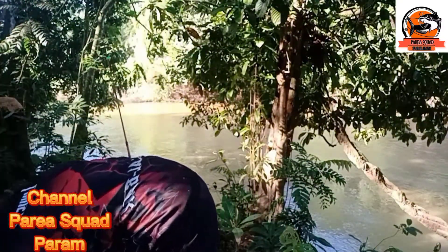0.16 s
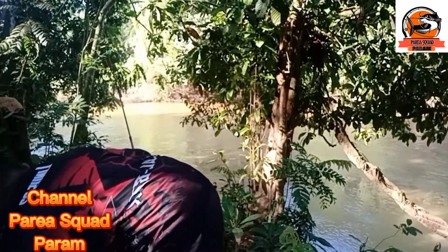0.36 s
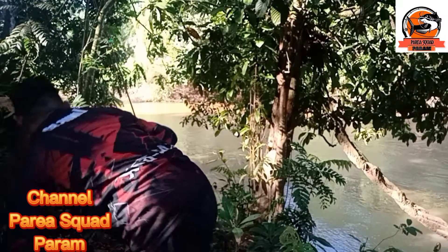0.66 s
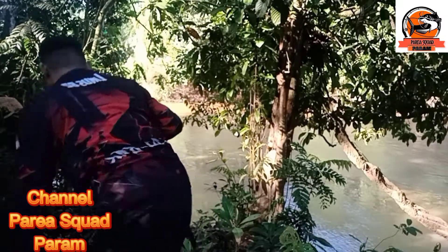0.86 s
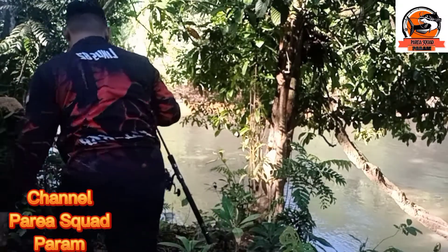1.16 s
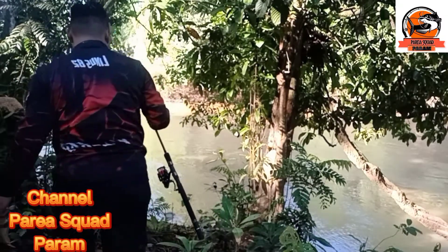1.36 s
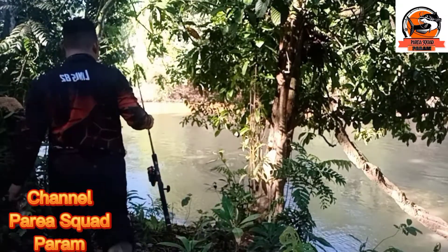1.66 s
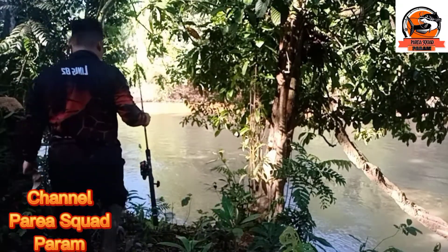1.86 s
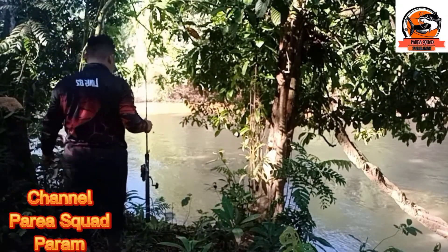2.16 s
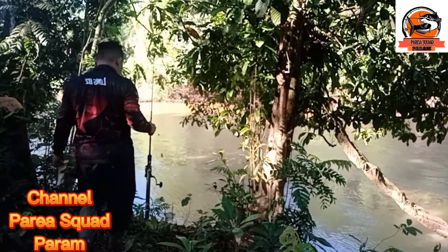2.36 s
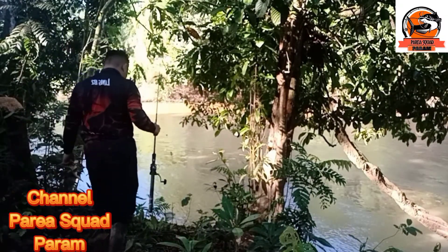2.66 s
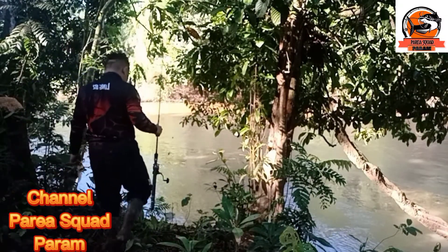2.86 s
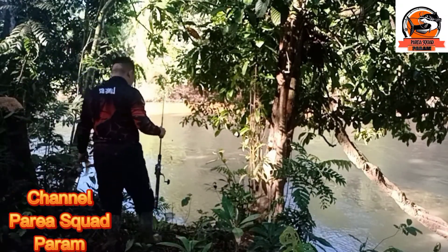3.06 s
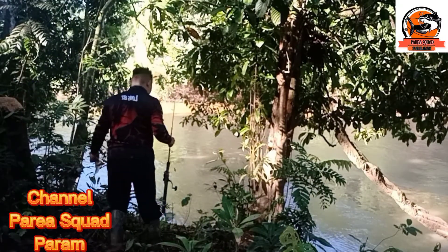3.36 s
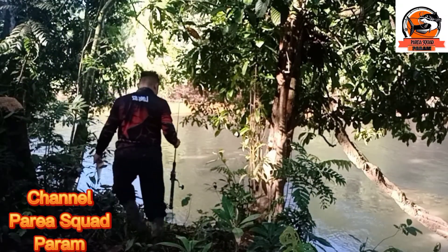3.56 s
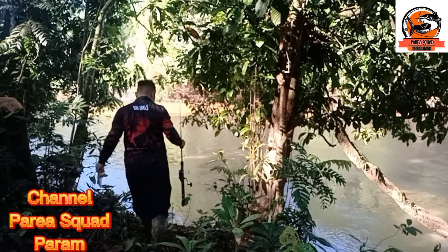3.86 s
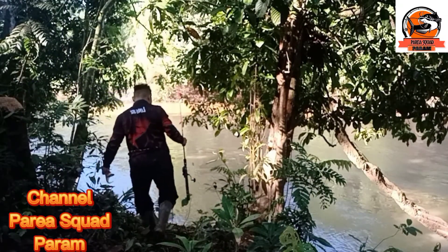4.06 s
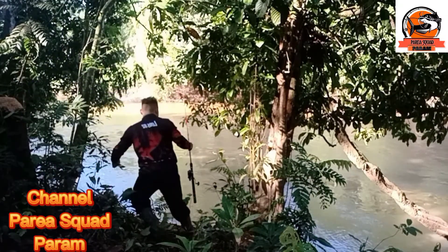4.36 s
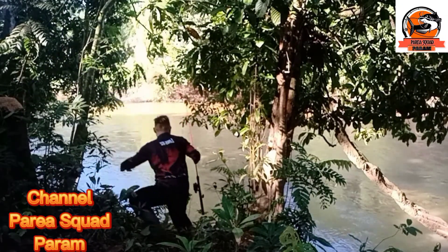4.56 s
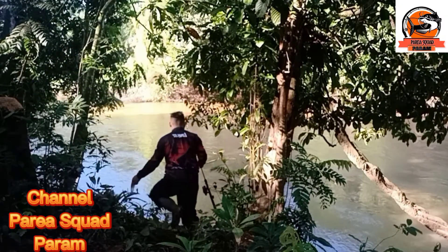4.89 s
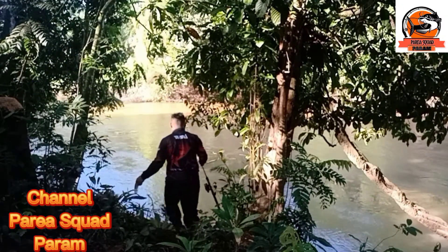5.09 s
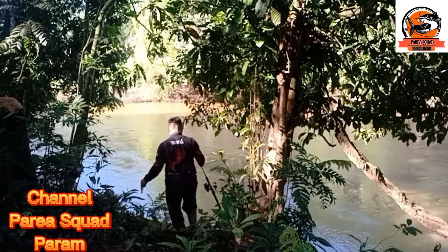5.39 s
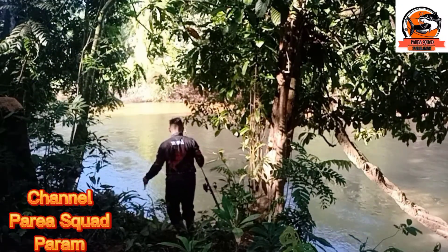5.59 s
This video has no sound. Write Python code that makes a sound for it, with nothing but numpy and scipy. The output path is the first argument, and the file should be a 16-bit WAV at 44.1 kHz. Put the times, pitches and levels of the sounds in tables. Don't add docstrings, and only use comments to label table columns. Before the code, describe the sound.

A continuous, piercing cicada chorus, strongest around 5.5 to 6 kHz with a fainter octave above, fills a riverside forest from start to end. A nearer singer throbs within it, roughly twelve or thirteen phrases a second, each with paired bursts. Underneath lies a low, soft river wash, with barely audible short bird glides at the start, around 2 to 2.5 seconds and near the end. From about 0.4 to 0.8 seconds leaves rustle under a moving person. Steps and woody taps come at 1.3 to 1.5; from 1.6 to 2.1 small metal tackle tinkles lightly. Soft steps continue from 2.2, with more twig knocks from 3 seconds and the sharpest, hard and dry, at 3.74. A crackling step and snap follow near 4.45, a thud with the strongest leaf crunch at 5.0 to 5.1, and another crunch with a twig knock at 5.7. Close stereo pickup, wide insects, little reverberation.

```python
import sys
import numpy as np
from scipy import signal
from scipy.fft import rfft, irfft
from scipy.io import wavfile
from scipy.ndimage import uniform_filter1d

SR = 44100
rng = np.random.default_rng(int(sys.argv[2]) if len(sys.argv) > 2 else 0)


def master_out(mix):
    frames = np.transpose(np.atleast_2d(mix))
    ceiling = np.clip(frames, -1, 1)
    pcm = np.round(ceiling * 32767).astype(np.int16)
    wavfile.write(sys.argv[1], SR, pcm)


def voltage_ratio(decibels):
    exponent = np.asarray(decibels, float) / 20
    return 10 ** exponent


N = 252693
TIME_S = np.arange(N) / SR

# (peak time [s], length [s], ground level [dB], leaf level [dB], dry-edge level [dB])
STEPS = [(0.437, 0.25, -65.5, -66, -116), (0.551, 0.13, -62, -58.5, -72.5), (0.64, 0.17, -73, -63.5, -81.5),
         (0.758, .13, -71, -56, -70.5), (1.306, .06, -59.5, -72, -73.5), (1.433, 0.17, -60.5, -59, -73),
         (2.165, 0.21, -64.5, -62, -82), (2.47, 0.03, -69, -84, -76.5), (2.562, 0.088, -60, -58, -73),
         (2.76, 0.11, -68, -66.5, -71), (3.014, 0.15, -60, -60.5, -91), (3.177, 0.12, -62, -63, -102),
         (3.438, 0.09, -58, -62.5, -79), (3.511, 0.062, -66, -69, -67.5), (3.636, 0.23, -60, -56, -72),
         (3.753, 0.17, -68, -52, -64.5), (3.843, 0.073, -79, -68, -75), (4.314, 0.072, -70, -65, -108),
         (4.467, 0.081, -57.5, -53.5, -63.5), (4.686, 0.27, -72.5, -66.5, -98),
         (5.046, 0.068, -50.5, -46, -84), (5.115, 0.16, -59, -53.5, -76), (5.452, 0.32, -63.5, -64, -88),
         (5.73, 0.11, -56.5, -48.5, -68)]


def evened(x):
    return x / np.sqrt(np.mean(x ** 2) + 1e-20)


def read(points, hz):
    point_hz, value = np.transpose(points)
    return np.interp(np.log(hz + 1), np.log(point_hz + 1), value)


def add(mix, start_s, sound):
    part = mix[..., round(start_s * SR):][..., :sound.shape[-1]]
    part += sound[..., :part.shape[-1]]


def coloured(x, spectrum, lo_hz, hi_hz):
    hz = np.fft.rfftfreq(N, 1 / SR)
    shaped = rfft(x) * voltage_ratio(read(spectrum, hz))
    in_band = (hz > lo_hz) & (hz < hi_hz)
    band_rms = np.sqrt(np.mean(irfft(shaped * in_band, N) ** 2))
    return irfft(shaped, N) / band_rms


def ports(a, b):
    # (frequency [Hz], left-right likeness [-1 to 1])
    likeness = [(60, 0.53), (150, 0.66), (380, -0.49), (950, -0.28), (2380, -0.53), (5980, -0.039),
                (15000, -0.043)]
    # (frequency [Hz], left minus right [dB])
    left_lean = [(60, -0.5), (180, -4), (550, -1.5), (1650, -2), (4970, -0.5), (15000, 3)]
    hz = np.fft.rfftfreq(N, 1 / SR)
    same = np.clip(read(likeness, hz), -1, 1)
    lean = voltage_ratio(read(left_lean, hz) / 2)
    a, b = rfft(a), rfft(b)
    left = a * lean
    right = (same * a + np.sqrt(1 - same ** 2) * b) / lean
    return irfft([left, right], N)


def from_near(x, lag_samples, pan_db):
    left = np.roll(x, lag_samples) * voltage_ratio(pan_db / 2)
    right = x * voltage_ratio(-pan_db / 2)
    return np.array([left, right])


def grains(per_s, spread_db, wash):
    happens = rng.random(N) < per_s / SR
    size = voltage_ratio(spread_db * np.minimum(rng.exponential(1, N), 4)) * happens
    clicks, blur = rng.standard_normal((2, 2, N))
    return evened(size * clicks) + wash * blur


def cicadas():
    # (frequency [Hz], density [dB per Hz])
    song_spectrum = [(3500, -37), (4900, -27.5), (5200, -11.5), (5600, -0.5), (5880, 3.5), (6150, -1.5),
                     (6600, -20), (7900, -25.5), (8600, -70.5), (10200, -43), (11000, -28), (11750, -19.5),
                     (13000, -32), (15500, -45)]
    # (time [s], level [dB])
    chorus = [(0.0, -46), (0.02, -42), (1.5, -42), (2.5, -42), (3.2, -41.5), (5.0, -41.5), (5.73, -41.5)]
    # (time [s], level re chorus [dB])
    near_level = [(0, -26.5), (1, -7), (2, -11), (3, -4.5), (4, -7.5), (5, -13), (5.73, -5.5)]
    # (frequency [Hz], level re song [dB])
    tymbal = [(5300, 4), (5780, -2), (5885, 12), (5990, 6.5), (6500, 6), (11500, -6.5), (11760, 9),
              (12000, 3)]
    # (time [s], phrase number)
    phrases = [
        (.052, 0),
        (2.034, 25),
        (2.988, 37),
        (3.862, 48),
        (5.222, 65),
        (5.78, 72),
    ]
    # (place [0-1], width [0-1], level [dB])
    bursts = [
        (.0, .035, 0),
        (.375, .035, 0),
        (.28, .19, -3),
    ]

    phrase = np.interp(TIME_S, *np.transpose(phrases), left=0)
    gate = np.zeros(N)
    for place, width, db in bursts:
        away = (phrase - place + .5) % 1 - .5
        gate += voltage_ratio(db) * np.exp(-.5 * (away / width) ** 2)
    near = voltage_ratio(np.interp(TIME_S, *np.transpose(near_level))) * evened(gate)

    near_clicks = near * evened(grains(per_s=6000, spread_db=5.9, wash=0.74))
    near_song = coloured(near_clicks, tymbal, 0, SR) * np.std(near) * 1.25
    clicks = rng.standard_normal((2, N)) + near_song
    clicks /= np.sqrt(uniform_filter1d(1 + near ** 2, SR // 3))
    song = coloured(ports(*clicks), song_spectrum, 5000, 7300)
    return voltage_ratio(np.interp(TIME_S, *np.transpose(chorus)) + 4.0) * song


def air():
    # (frequency [Hz], density [dB per Hz])
    spectrum = [(26, -30), (45, -8.5), (54, -7.5), (98, 0), (343, -11), (617, -7), (1320, -10), (1950, -9),
                (2520, -5), (2890, -20.5), (3440, -21), (4110, -23), (4800, -9.5), (6240, -31),
                (10600, -120)]
    level_db, patchiness_db = -64.5, .8
    swell = evened(uniform_filter1d(rng.standard_normal(N), 3000))
    wash = coloured(ports(*grains(per_s=900, spread_db=4.0, wash=2.5)), spectrum, 25, 4000)
    return voltage_ratio(level_db + patchiness_db * swell) * wash


def birds():
    # (start [s], end [s], first frequency [Hz], last frequency [Hz], level [dB])
    whistles = [(0, 0.026, 2320, 2160, -62), (0.066, 0.114, 2220, 2380, -62.5),
                (0.106, 0.147, 750, 704, -62.5), (.235, .26, 2500, 2440, -62),
                (0.338, 0.377, 684, 650, -61), (1.998, 2.042, 1370, 1550, -64),
                (2.045, 2.085, 2120, 2024, -59), (2.08, 2.115, 1844, 1910, -60),
                (2.382, 2.436, 1420, 1520, -62), (2.422, 2.464, 1705, 1830, -64),
                (2.461, 2.487, 2050, 1950, -57), (3.276, 3.323, 857, 660, -62),
                (5.44, 5.474, 2520, 2740, -58), (5.477, 5.519, 2740, 2670, -61),
                (5.59, 5.64, 2560, 2430, -56.5), (5.63, 5.711, 2230, 2130, -61)]
    out = np.zeros((2, N))
    for start_s, end_s, first_hz, last_hz, db in whistles:
        hz = np.linspace(first_hz, last_hz, round((end_s - start_s) * SR))
        flutter = .8 + .6 * evened(uniform_filter1d(rng.standard_normal((2, len(hz))), 150))
        glide = np.sin(2 * np.pi * np.cumsum(hz) / SR) * signal.windows.tukey(len(hz), .6)
        add(out, start_s, voltage_ratio(db) * flutter * glide)
    return out


def trodden(peaks_db, bed_db, fall_db):
    rise_share = 0.37
    t = TIME_S[::64]
    power = voltage_ratio(2 * bed_db) * np.ones(len(t))
    for (peak_s, length_s, *_), db in zip(STEPS, peaks_db):
        away = np.maximum((peak_s - t) / rise_share, (t - peak_s) / (1 - rise_share)) / length_s
        power += voltage_ratio(2 * (db - fall_db * np.minimum(away, 10)))
    return np.interp(TIME_S, t, np.sqrt(power))


def litter():
    # (frequency [Hz], density [dB per Hz])
    ground = [(60, -35.5), (200, -7.5), (400, -1), (750, -1.5), (1100, -8), (2000, -62.5)]
    leaves = [(500, -11.5), (1200, -13.5), (2000, -6), (2700, -5.5), (3500, -15.5), (5000, -63)]
    thin = [(2000, -11.5), (3000, 3.5), (4000, 7), (5200, 15), (7000, -3), (8500, -47)]
    dry_edges = [(5000, -35), (7000, 24), (9300, -0.5), (12000, 4.5), (15500, 16)]
    # (ground, leaves, thin, dry edges [dB])
    beds_db = (-72.5, -69.5, -80, -102.5)
    # (ground, leaves, thin, dry edges [dB])
    falls_db = (12.5, 10.5, 11.8, 19)

    ground_db, leaves_db, dry_db = np.transpose(STEPS)[2:]
    thin_db = 3.5 + leaves_db + 0.35 * (dry_db - leaves_db)
    layers = ((ground_db, ground, (150, 1000), 400, .3),
              (leaves_db, leaves, (1300, 2900), 1200, .7),
              (thin_db, thin, (3000, 4300), 1500, .8),
              (dry_db, dry_edges, (8400, 10300), 2500, .8))
    out = np.zeros((2, N))
    for (db, colour, band_hz, per_s, spread), bed_db, fall_db in zip(layers, beds_db, falls_db):
        direct, around = coloured(grains(per_s, spread_db=2.0, wash=0.74), colour, *band_hz)
        scattered = np.array([around, np.roll(around, 900)])
        crackle = 1.05 * from_near(direct, lag_samples=4, pan_db=-2.0) + spread * scattered
        out += crackle * trodden(db, bed_db, fall_db)
    return out


def ring(hz, t60_s, rise_s, phase=0):
    t = np.arange(SR // 8) / SR
    envelope = voltage_ratio(-60 * t / max(t60_s, .002)) * (1 - np.exp(-t / rise_s))
    return envelope * np.sin(2 * np.pi * hz * t + phase)


def modes(modes_hz, seed, t60_s, phase_span):
    return sum(ring(hz * (.94 + .12 * u), t60_s, .0001, phase_span * u) for hz, u in zip(modes_hz, seed))


def twigs():
    # (time [s], peak [dB], body [Hz], upper modes [dB])
    light_knocks = [(.458, -55, 607, 6), (.526, -49, 587, 3), (.55, -56.5, 441, -7),
                    (1.129, -58.5, 213, -4), (2.019, -54, 520, -16), (2.554, -52, 786, -2),
                    (2.714, -52.5, 583, 1), (2.755, -46, 740, -6.5), (2.991, -41, 560, -6),
                    (3.174, -47.5, 620, -8), (3.504, -53.5, 740, 8), (3.598, -43, 714, 2),
                    (3.618, -39, 679, 0.5), (3.729, -46, 980, -3.5), (3.737, -25.5, 775, 1.5),
                    (3.741, -35.5, 530, 7), (3.986, -47.5, 640, 3), (4.424, -55, 552, -1),
                    (4.456, -51, 474, 11), (4.7, -53, 211, 2.5), (4.978, -43.5, 765, 4.5),
                    (5.05, -52, 383, 2), (5.057, -47, 280, -4), (5.093, -58, 802, -3), (5.134, -56, 590, 4),
                    (5.412, -49.5, 450, -6), (5.507, -51, 203, 3), (5.573, -50, 506, 6),
                    (5.708, -46.5, 645, 5.5), (5.718, -36, 680, -0.5)]
    # (time [s], peak [dB], body [Hz])
    thuds = [(1.293, -52.5, 270), (1.402, -51, 770), (1.467, -47, 630), (1.477, -41, 460),
             (2.585, -48, 681), (3.018, -56, 254), (3.112, -58.5, 258), (3.418, -44, 304),
             (3.42, -42.5, 1000), (3.45, -44, 470), (3.756, -45, 524), (5.022, -33.5, 517),
             (5.03, -41, 407), (5.038, -41, 337), (5.044, -42.5, 338)]
    # (time [s], crack [dB], snap [dB])
    broken = [(.526, -54, -72), (.55, -57, -77), (1.306, -76, -67.5), (1.402, -43, -74), (1.478, -61, -63),
              (2.019, -69, -72), (2.554, -56, -64), (2.755, -34.5, -87), (3.504, -64, -70),
              (3.598, -60, -54), (3.618, -52, -66), (3.729, -56, -65.5), (3.736, -53, -51),
              (3.741, -56, -68), (3.758, -39.5, -70), (4.456, -44.5, -38), (4.978, -55, -75),
              (5.052, -60, -76), (.77, -45, -70), (5.507, -62, -90), (5.573, -49, -79), (5.708, -55, -69),
              (5.719, -42, -61)]
    thud_upper_db, knock_crack_db = -12, -17

    t = np.arange(SR // 8) / SR
    wood, splinters = np.zeros(N), np.zeros(N)
    knocks = [(*row, thud_upper_db) for row in thuds] + list(light_knocks)
    for (s, db, hz, upper_db), seed in zip(knocks, rng.random((len(knocks), 4))):
        body = ring(hz, 8.9 / hz, 0.00014)
        body += .5 * ring(hz * (1.43 + 0.42 * seed[0]), 6.5 / hz, 0.0002)
        upper = modes((1350, 1700, 2050, 2550), seed, t60_s=.013, phase_span=3)
        add(wood, s + 0.00251, voltage_ratio(db) * (1.76 * body + 0.81 * voltage_ratio(upper_db) * upper))

    faint = [(s, db + knock_crack_db, db + 2 * knock_crack_db) for s, db, *_ in knocks]
    breaks = list(broken) + faint
    for (s, crack_db, snap_db), seed in zip(breaks, rng.random((len(breaks), 4))):
        crack = modes((3600, 4150, 4700, 5300), seed, t60_s=.008, phase_span=6)
        snap = signal.lfilter([1, -.6], 1, rng.standard_normal(len(t))) * voltage_ratio(-60 * t / .016)
        add(splinters, s + .0017, voltage_ratio(crack_db) * crack + voltage_ratio(snap_db) * snap)

    wood = signal.sosfilt(signal.butter(2, 150, "high", fs=SR, output="sos"), wood)
    tail = rng.standard_normal((2, len(t))) * voltage_ratio(-60 * t / 0.13)
    tail /= np.linalg.norm(tail[0])
    scattered = signal.oaconvolve((wood + splinters)[None], tail, axes=1)[:, :N]
    direct = from_near(wood, lag_samples=6, pan_db=-1.9)
    direct += from_near(splinters, lag_samples=9, pan_db=-4.0)
    return direct + voltage_ratio(-11) * scattered


def tackle():
    # (time [s], low-mode peak [dB], high mode re low [dB])
    tinkles = [(0.8894, -59, -8), (1.6434, -47, 6), (1.659, -48, -15), (1.6784, -57, -11),
               (1.7009, -47.5, -19), (1.7202, -39, -18), (1.755, -52, 3), (1.7658, -48.5, 9.5),
               (1.798, -48, -2), (1.8362, -52, -10), (1.873, -59, 8), (1.9054, -41, -2), (1.9249, -40, -8),
               (1.9716, -45.5, 1), (1.999, -47, -22), (2.042, -48, -5), (2.0628, -46, -14), (2.349, -58, 7),
               (2.9935, -55, -2), (3.4655, -53, 2), (3.484, -48, 2), (3.5714, -63, 10), (4.7042, -53, 6),
               (4.738, -54, 9.5), (4.8673, -59, 2), (5.005, -51, -8), (5.031, -60, -10), (5.101, -59, -3),
               (5.1337, -60, 3), (5.419, -64, 9)]
    # (frequency [Hz], t60 [s])
    metal_modes = [
        (4462, .15),
        (4783, .07),
    ]
    out = np.zeros((2, N))
    (low_hz, low_t60_s), (high_hz, high_t60_s) = metal_modes
    for (s, db, high_db), u in zip(tinkles, rng.random((len(tinkles), 3))):
        low = ring(low_hz * (1 + 0.0076 * (u[0] - .5)), low_t60_s, 0.0027, 2 * np.pi * u[1])
        high = ring(high_hz * (1 + 0.01 * (u[1] - .5)), high_t60_s, 0.002, 2 * np.pi * u[2])
        tinkle = from_near(low, lag_samples=3, pan_db=-7.5)
        tinkle += voltage_ratio(high_db) * from_near(high, lag_samples=3, pan_db=8)
        add(out, s, voltage_ratio(db + 2.5) * tinkle)
    flutter = evened(uniform_filter1d(rng.standard_normal((2, N)), 200))
    return out * (1 + 0.21 * flutter)


def scene():
    return cicadas() + air() + birds() + litter() + twigs() + tackle()


def top_cut(x):
    return signal.sosfilt(signal.butter(12, 15600, fs=SR, output="sos"), x)


def record(dry):
    offset = .00107
    return top_cut(dry + offset)


dry = scene()
out = record(dry)
master_out(out)
```